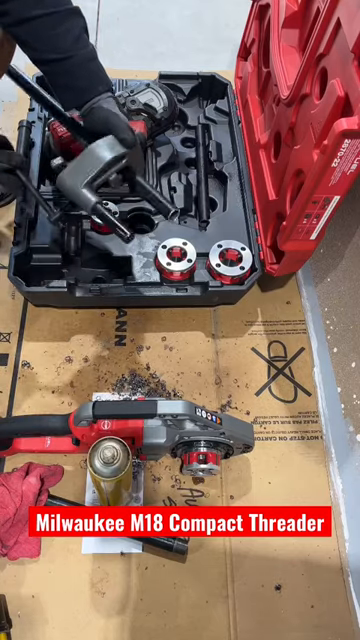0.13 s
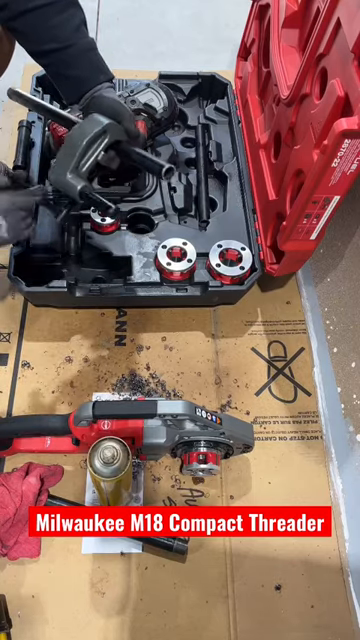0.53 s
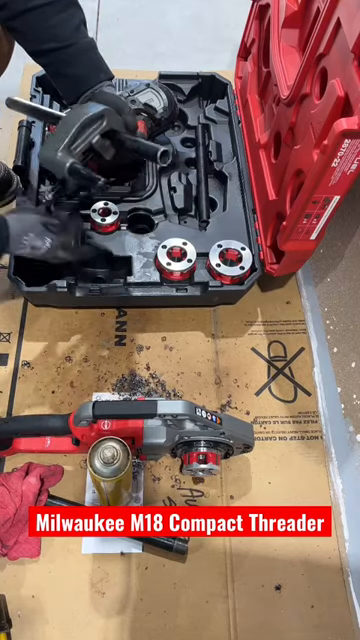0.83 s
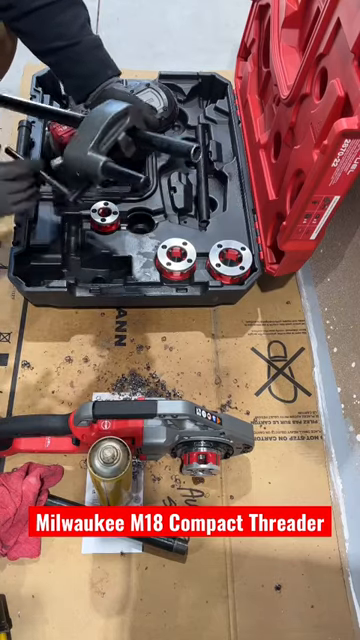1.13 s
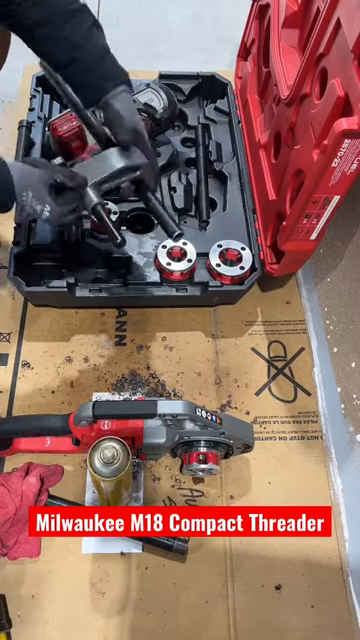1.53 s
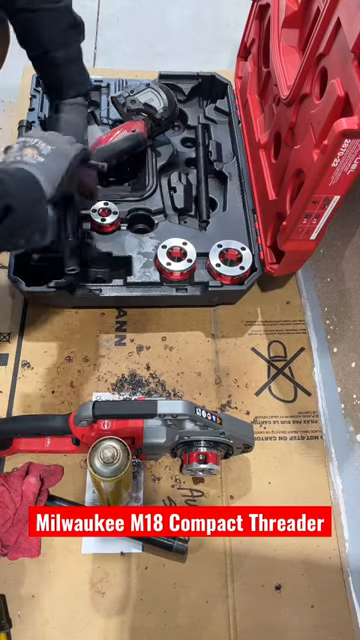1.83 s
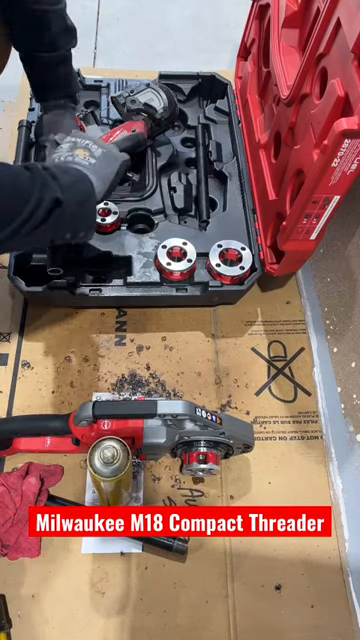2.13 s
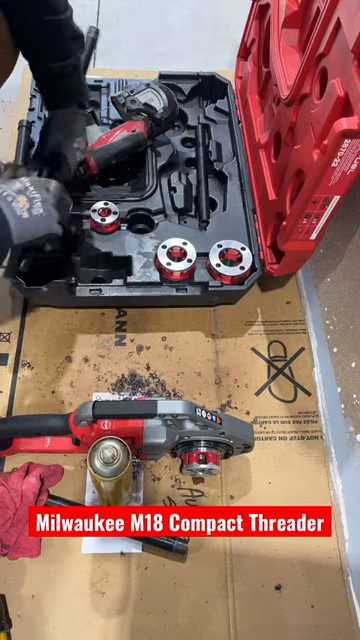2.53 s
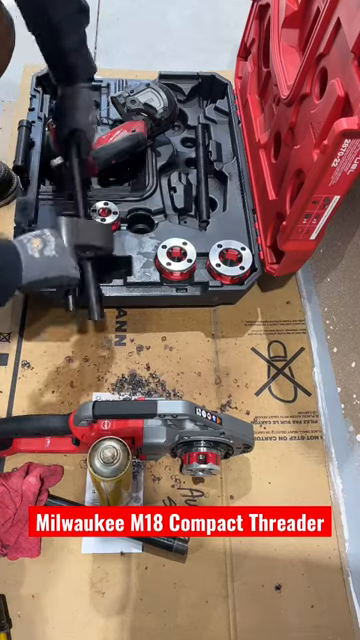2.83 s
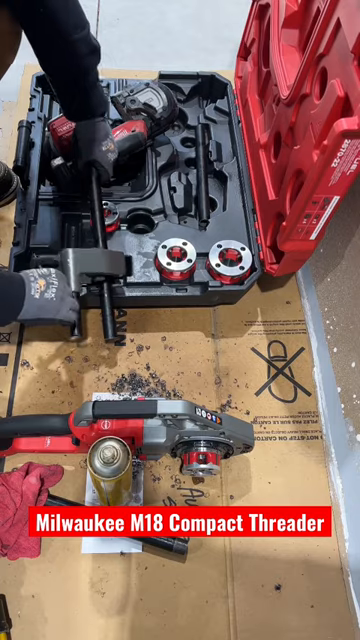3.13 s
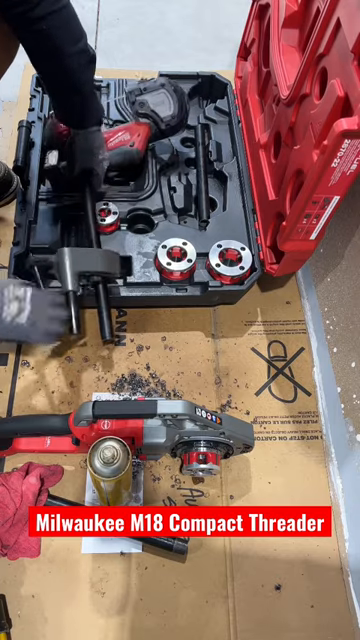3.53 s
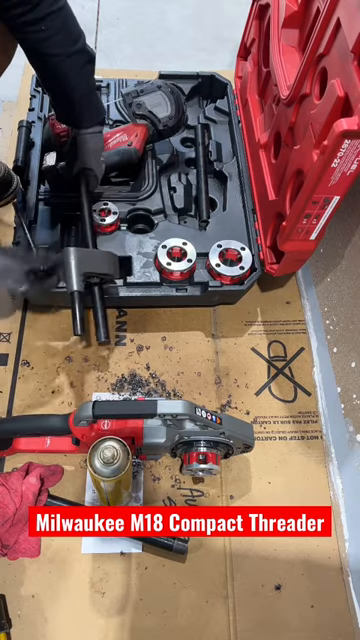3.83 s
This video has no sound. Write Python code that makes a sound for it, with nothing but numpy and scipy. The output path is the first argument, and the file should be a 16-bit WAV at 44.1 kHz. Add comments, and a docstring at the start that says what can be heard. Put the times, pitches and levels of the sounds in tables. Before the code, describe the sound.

A steel tool bracket is handled with gloves: a sharp click, faint rustles and small ticks, then a loud hollow clank on a plastic case, rattling bounces and a harder metal clank; quiet workshop, close stereo microphone.

```python
"""A quiet workshop, close stereo microphone: gloved hands work a steel bracket over a hollow plastic tool case.
Sleeves and gloves rustle as shaped noise; small parts tick, then the bracket drops and bounces as
blows that ring case and steel modes. Its rod squeaks by stick-slip pulses and clanks home, leaving
dying clusters of partials. A distant hum of wavering sines and a murmur of low noise lie beneath."""
import sys
import numpy as np
from scipy import signal
from scipy.io import wavfile

SR = 44100
rng = np.random.default_rng(int(sys.argv[2]) if len(sys.argv) > 2 else 0)


def master_out(mix):
    """Clip the mix to full scale and print it as 16-bit PCM to the path in sys.argv[1]."""
    frames = np.transpose(np.atleast_2d(mix))
    ceiling = np.clip(frames, -1, 1)
    pcm = np.round(ceiling * 32767).astype(np.int16)
    wavfile.write(sys.argv[1], SR, pcm)


def gain_from_decibels(decibels):
    """Convert decibel values to linear amplitude factors."""
    exponent = np.asarray(decibels, float) / 20
    return 10 ** exponent


N = 176400


def unit(x):
    """Scale to rms 1."""
    return x / np.sqrt(np.mean(x ** 2) + 1e-20)


def in_time(rows):
    """Table columns joined by straight lines in time."""
    s, *columns = np.transpose(rows)
    return [np.interp(np.arange(N) / SR, s, column) for column in columns]


def at_hz(rows, hz, axis=1):
    """A table column read on a log-frequency axis."""
    table = np.array(rows)
    return np.interp(np.log(hz), np.log(table[:, 0]), table[:, axis])


def drift(rate_hz):
    """Slow random wander of rms 1: noise through two equal one-pole low-passes."""
    r = np.exp(-2 * np.pi * rate_hz / SR)
    noise = rng.standard_normal(N + SR)
    return unit(signal.lfilter([1], [1, -2 * r, r * r], noise)[SR:])


def band_pass(x, low_hz, high_hz, order=2):
    """Keep one band of the sound."""
    sos = signal.butter(order, [low_hz, high_hz], "band", fs=SR, output="sos")
    return signal.sosfilt(sos, x)


# How alike the two channels hear diffuse noise: f/Hz, left-right likeness (0-1)
LIKENESS = [(100, .999), (250, 0.99), (500, 0.91), (1200, 0.06), (2400, 0.97), (5000, 0.6), (12000, 0.36)]


def noise_bands(size, gain):
    """Stereo noise in half-octave bands, each weighted by gain(hz) and widened by its likeness."""
    edges = 31.5 * 2 ** np.arange(0, 9.3, .5)   # Hz
    white = rng.standard_normal((2, 2, size))
    out = 0
    for k, (low, high) in enumerate(zip(edges, edges[1:])):
        # neighbouring bands use different noise
        mid, side = band_pass(white[k % 2], low, high)
        hz = np.sqrt(low * high)
        alike = np.clip(at_hz(LIKENESS, hz), 0, 1)
        stereo = np.sqrt(1 + alike) * mid + np.sqrt(1 - alike) * side * [[1], [-1]]
        out = out + gain(hz) * stereo
    return out


# Spectrum of the room's murmur: f/Hz, relative level/dB per Hz
MURMUR_SPECTRUM = [(18, -58), (30, -24), (106, 4.5), (165, 1), (194, -10.5), (252, -5), (554, -15),
                   (937, -20), (1100, -23), (1500, -47), (3300, -33.5), (5000, -57), (16000, -59)]


def murmur():
    """Steady low noise of the room."""
    return gain_from_decibels(-59) * unit(noise_bands(N, lambda hz: gain_from_decibels(at_hz(MURMUR_SPECTRUM, hz))))


# Distant hum tones: f/Hz, level/dB, width of the pitch wander/Hz
HUM_TONES = [(192.5, -62, 2.96), (1080, -81, 2.3)]


def hum():
    """Sines whose pitch and level waver slightly, equal in both channels."""
    out = 0
    for hz, db, width_hz in HUM_TONES:
        level = gain_from_decibels(db + 0.83 * drift(19))
        phase = 2 * np.pi * np.cumsum(hz + width_hz / 2 * drift(4.5)) / SR
        out = out + level * np.sqrt(2) * np.sin(phase)
    return out


# Steady rustle over time: t/s, level/dB
RUSTLE_LEVEL = [(0, -66), (.3, -66.5), (.45, -73.5), (.75, -69), (1.05, -71.5), (1.35, -67), (1.6, -67),
                (1.75, -70), (1.95, -73.5), (2.2, -80.5), (2.5, -75), (2.75, -70.5), (3.05, -70), (4, -56)]
# Its spectrum: f/Hz, relative level/dB per Hz
RUSTLE_SPECTRUM = [(710, -24), (1200, -2.5), (1950, -9.5), (2270, -7.5), (3220, -5.5), (4910, -12.5),
                   (9720, -14.5), (16000, -22)]


def steady_rustle():
    """Faint noise between the swishes, its level wandering."""
    noise = unit(noise_bands(N, lambda hz: gain_from_decibels(at_hz(RUSTLE_SPECTRUM, hz))))
    return noise * gain_from_decibels(in_time(RUSTLE_LEVEL)[0] + 1.8 * drift(22))


# Dull handling noise over time: t/s, level/dB
SHUFFLE_LEVEL = [(0, -56), (.3, -61.5), (.42, -79.5), (.8, -62.5), (1.1, -70.5), (1.35, -64), (1.45, -56.5),
                 (1.55, -72.5), (1.9, -86), (1.97, -68), (2.05, -109.5), (2.9, -108), (3.05, -56.5),
                 (4, -55)]
# Bands that colour it: f/Hz, width/Hz, relative level/dB
SHUFFLE_BANDS = [(520, 106, 25.5), (900, 130, 19), (1510, 440, -23.5)]


def shuffle(white):
    """Dull handling: noise in a few mid bands, partly shared by the channels."""
    stereo = white[0] + 1.0 * white
    dull = 0
    for hz, width, db in SHUFFLE_BANDS:
        dull = dull + gain_from_decibels(db) * unit(band_pass(stereo, hz - width / 2, hz + width / 2, order=1))
    return unit(dull) * gain_from_decibels(in_time(SHUFFLE_LEVEL)[0] + 1.92 * drift(40))


def contact_rise(t):
    """A blow's onset: the contact takes 0.9 ms to build."""
    return np.minimum(t / 0.0009, 1)


def blows(hits, modes, crack_db, crack_s, wash_db, wash_s, spread_db, uneven_db):
    """Each blow rings the modes plus a noise crack and a longer wash; soft contacts are dull, light ones thin."""
    mode_scatter = 0.027   # each contact point shifts the modes by about this share
    rattle_per_s = 150   # rate at which the wash's unevenness changes
    out, t = np.zeros(N + SR), np.arange(SR // 3) / SR
    hz, db, t60 = np.array(modes).T[:, :, None]
    for s, level_db, hard_hz, low_hz in hits:
        luck = rng.standard_normal((3, len(modes), 1))
        level = np.sign(luck[0]) * gain_from_decibels(db + spread_db * luck[1] - 60 * t / t60)
        ringing = np.sum(level * np.sin(2 * np.pi * hz * (1 + mode_scatter * luck[2]) * t), axis=0)
        rattle_db = uneven_db * np.interp(t * rattle_per_s, np.arange(200), rng.standard_normal(200))
        crack = gain_from_decibels(crack_db - 60 * t / crack_s)
        wash = gain_from_decibels(crack_db + wash_db + rattle_db - 60 * t / wash_s)
        blow = ringing + (crack + wash) * rng.standard_normal(len(t))
        high_hz = np.clip(hard_hz, low_hz * 1.1, 19000)
        blow = band_pass(blow * contact_rise(t), low_hz, high_hz, order=3)
        start = int(s * SR)
        out[start:start + len(t)] += gain_from_decibels(level_db) * blow
    mic_low_cut = signal.butter(2, 95.3, "high", fs=SR, output="sos")
    return signal.sosfilt(mic_low_cut, out[:N])


# Steel against steel: t/s, level/dB, contact hardness f/Hz, lowest moving f/Hz
STEEL_HITS = [(0.063, -49, 16500, 1940), (0.0972, -23.5, 7200, 2280), (0.0985, -36.5, 15900, 9700),
              (0.361, -65, 9000, 2300), (0.485, -57, 3970, 2000), (0.570, -51.5, 3500, 2670),
              (0.603, -50.5, 2800, 1530), (0.633, -48.5, 14000, 4530), (0.704, -57, 9000, 3000),
              (1.165, -61, 12000, 5060), (1.206, -45.5, 12000, 1800), (1.308, -51.5, 5000, 2500),
              (1.322, -48.5, 8300, 2450), (1.715, -60, 10200, 6100), (1.798, -61, 12000, 2840),
              (2.325, -69, 15000, 9000), (2.674, -65, 7000, 1980), (2.74, -68, 4500, 2000),
              (3.0735, -20, 16400, 2800), (3.079, -16, 6960, 1960), (3.093, -29, 12000, 2000),
              (3.336, -43, 5450, 3380), (3.355, -34, 8800, 2870), (3.404, -38, 4050, 3060),
              (3.564, -46.5, 14000, 5760), (3.610, -45, 14900, 2460), (3.717, -14.5, 16500, 3200),
              (3.7185, -7.5, 10400, 9480), (3.7215, -50, 14000, 3480), (3.866, -53, 14000, 5000)]
# Short-ringing steel modes: f/Hz, relative level/dB
STEEL_MODES = [(2400, 7), (3050, 4.5), (3500, 3), (3900, 8.5), (4250, 6), (4700, 1), (5300, -15), (5800, 0),
               (6500, -17), (9400, 7), (10250, -9), (11200, 3), (13700, -6)]


def steel_clanks():
    """Steel blows: modes that die within 5 ms, a bright crack and a faint longer wash."""
    modes = [(hz, db, .005) for hz, db in STEEL_MODES]   # t60 in s
    return blows(STEEL_HITS, modes, crack_db=4.5, crack_s=0.029, wash_db=-23, wash_s=0.32,
                 spread_db=1.5, uneven_db=0.5)


# Blows on the case: t/s, level/dB, contact hardness f/Hz, lowest moving f/Hz
CASE_HITS = [(0.0972, -40.5, 1070, 500), (0.279, -52, 2900, 700), (0.70, -48.5, 700, 248),
             (1.208, -45.5, 1170, 910), (1.21, -52, 2060, 1750), (1.422, -50, 1180, 700),
             (1.443, -50, 1200, 500), (1.94, -54.5, 1720, 1420), (1.955, -53, 1650, 1230),
             (1.984, -48.5, 1070, 770), (2.643, -44, 1210, 600), (2.658, -59, 1200, 603),
             (2.683, -41, 1480, 387), (2.685, -41, 1090, 784), (3.0705, -7.5, 2420, 342),
             (3.0735, -7.5, 900, 126), (3.0765, -3.5, 338, 212), (3.079, -16.5, 563, 79),
             (3.087, -23, 400, 107), (3.093, -18, 2530, 296), (3.145, -30, 1800, 298),
             (3.167, -34, 1200, 400), (3.18, -30, 835, 159), (3.24, -37.5, 1460, 298),
             (3.295, -39, 604, 151), (3.337, -50.5, 2180, 900), (3.345, -35.5, 2670, 600),
             (3.347, -27.5, 500, 147), (3.354, -27, 1120, 500), (3.358, -25, 2130, 1420),
             (3.361, -17.5, 396, 190), (3.364, -29, 520, 360), (3.379, -26, 2140, 1470),
             (3.386, -33.5, 490, 134), (3.401, -33.5, 700, 137), (3.442, -40, 700, 142),
             (3.513, -46, 1510, 202), (3.548, -32, 700, 272), (3.568, -34, 1600, 463),
             (3.58, -30.5, 204, 100), (3.610, -29, 2650, 454), (3.622, -28.5, 1440, 278),
             (3.7185, -11, 1800, 520), (3.722, -27, 970, 142), (3.737, -25, 1150, 403),
             (3.79, -32, 1990, 380)]
# Modes of the hollow case: f/Hz, relative level/dB, t60/s
CASE_MODES = [(98, -7, 0.084), (137, 2, 0.11), (181, -8, 0.16), (206.6, -6.5, 0.2), (244.7, -3.5, 0.049),
              (277.5, -5.5, 0.085), (356.4, -7.5, 0.082), (415, -2.5, 0.05), (490.6, -14.5, 0.16),
              (584, -3.5, 0.053), (645, -7, 0.074), (762, -5, 0.027), (867.6, -4.5, 0.038),
              (1025, -11, 0.06), (1288, 7, 0.0098), (1464, -10, 0.039), (1786, -1.5, 0.018),
              (1850, 0, 0.012), (2776, -6, 0.058),]


def case_thumps():
    """Blows ring the hollow case; loose parts buzz unevenly after each."""
    return blows(CASE_HITS, CASE_MODES, crack_db=2.5, crack_s=0.059, wash_db=-8.5, wash_s=0.13,
                 spread_db=0.0, uneven_db=4.5)


# Free steel parts left ringing: t/s, f/Hz, level of each partial/dB, t60/s, spread of partials/Hz
FREE_RINGS = [(0.099, 10050, -49.5, 0.21, 156), (0.099, 7250, -52, 0.33, 150), (3.08, 14350, -41, 0.18, 40),
              (3.143, 4030, -68, 0.13, 34), (3.718, 5550, -45, 0.23, 14), (3.72, 2320, -51, 0.4, 40),
              (3.722, 10500, -57, 0.25, 298), (3.72, 14580, -53, 0.27, 40), (3.72, 900, -30, 0.15, 35)]


def rings():
    """Dying rings, each a close uneven cluster of six partials."""
    out, t = np.zeros(N + SR), np.arange(SR // 2) / SR
    for s, hz, db, t60, spread_hz in FREE_RINGS:
        luck = rng.standard_normal((2, 6, 1))
        partials = np.sin(2 * np.pi * (hz + spread_hz * luck[0]) * t + 2 * luck[1])
        start = int(s * SR)
        out[start:start + len(t)] += gain_from_decibels(db - 60 * t / t60) * partials.sum(0) * contact_rise(t)
    return out[:N]


# Glove and sleeve swishes: t/s, length/s, cloth level/dB, duller rubbing level/dB
SWISH_STROKES = [(0.361, 0.012, -49.5, -57), (0.467, 0.018, -61.5, -73), (0.613, 0.039, -61.5, -81),
                 (0.872, 0.1, -69, -69.5), (1.086, 0.018, -69, -80), (1.267, 0.097, -61.5, -76),
                 (1.388, 0.11, -71, -73), (1.493, 0.044, -67.5, -61.5), (1.528, 0.084, -58, -70),
                 (1.631, 0.039, -60, -75), (1.795, 0.024, -60.5, -75), (1.837, 0.076, -74, -75),
                 (2.535, 0.038, -57.5, -62), (2.56, 0.058, -52.5, -70), (2.656, 0.06, -69.5, -77),
                 (2.792, 0.032, -77, -67), (2.808, 0.054, -56, -65), (2.922, 0.15, -73, -83),
                 (3.328, 0.091, -54.5, -51.5), (3.514, 0.08, -68, -64), (3.954, .08, -54.5, -58.5)]


def strokes():
    """Level over time of all strokes together, for the cloth and for the rubbing under it."""
    edge_s, fade_s = 0.05, 0.053   # rise and fall of a stroke, centred on its two ends
    t = np.arange(N) / SR
    s, length, cloth_db, rub_db = np.array(SWISH_STROKES).T[:, :, None]
    ramp = np.minimum((t - s) / edge_s, (s + length - t) / fade_s) + .5
    stroke = np.sin(np.pi / 2 * np.clip(ramp, 0, 1)) ** 4
    return np.sum(gain_from_decibels(cloth_db) * stroke, axis=0), np.sum(gain_from_decibels(rub_db) * stroke, axis=0)


# Spectrum of the cloth: f/Hz, relative level/dB per Hz
CLOTH_SPECTRUM = [(710, -43), (1200, -12), (2180, -23.5), (3790, 5.5), (4550, -4), (6300, -2.5), (7020, 3),
                  (13600, -2), (16000, -7)]


def cloth_swishes(level):
    """Bright cloth noise, each band flickering on its own, with a fast grain over all."""
    cloth = unit(noise_bands(N, lambda hz: gain_from_decibels(at_hz(CLOTH_SPECTRUM, hz) + 2.9 * drift(32))))
    return cloth * level * gain_from_decibels(2 * drift(144))


def rubbing(white, level):
    """Grainy, duller noise under the swishes, nearly alike in both channels."""
    rub = unit(band_pass(white[0] + 0.14 * white, 2370, 4500))
    return rub * level * gain_from_decibels(2.5 * drift(100))


# The rod squeaks in its bore: t/s, level/dB, slips per s, brightness/dB
SQUEAK_COURSE = [(3.655, -77, 1360, -20), (3.668, -47.5, 1080, -6), (3.682, -39.5, 1370, -10),
                 (3.695, -38, 1320, 4.5), (3.714, -38, 1200, 2.5), (3.717, -22, 1200, -16)]
# Resonances of the rod: f/Hz, width/Hz, relative level/dB, share of the brightness taken (0-1)
ROD_BANDS = [(1360, 1200, 0.5, 0), (2230, 240, -10.5, 0.4), (3870, 500, -13.5, 0), (7160, 566, -5.5, 0.96),
             (8600, 800, -2.5, 0.8), (10300, 730, -7, 1), (12000, 1900, -5.5, 0.84)]


def squeak():
    """Stick-slip pulses, uneven in timing and strength, ring the rod's resonances."""
    db, rate, bright_db = in_time(SQUEAK_COURSE)
    t = np.arange(N) / SR
    cycles = np.cumsum(rate * (1 + 0.033 * drift(400))) / SR
    pulses = np.diff(np.floor(cycles), prepend=0)
    slips = pulses * (1 + 0.95 * rng.standard_normal(N)) + 0.041 * rng.standard_normal(N)
    out = 0
    for hz, width, band_db, bright in ROD_BANDS:
        band = unit(band_pass(slips, hz - width / 2, hz + width / 2))
        out = out + gain_from_decibels(band_db + bright * bright_db) * band
    return gain_from_decibels(db) * out * (t > SQUEAK_COURSE[0][0]) * (t < SQUEAK_COURSE[-1][0])


def ports(x):
    """Two close microphone ports: most of the treble reaches the left one sample late, the mids lean left."""
    lean = gain_from_decibels(-12) * band_pass(x, 500, 1730)
    treble = signal.butter(2, 6500, "high", fs=SR, output="sos")
    late = 0.89 * signal.sosfiltfilt(treble, x)
    left = x + lean + np.roll(late, 1) - late
    right = gain_from_decibels(-1) * (x - lean)
    return np.array([left, right])


# The workshop's tail: f/Hz, t60/s, level/dB
ROOM_TAIL = [(100, 0.54, -11), (258, 0.4, -11), (700, 0.54, -10.5), (1800, 0.76, -18), (3150, 0.53, -14),
             (5730, 0.84, -13), (9000, 0.74, -22.5), (14000, 0.7, -18.5)]


def room(x):
    """Diffuse noise tail that builds over 12 ms and dies band by band."""
    t = np.arange(SR * 3 // 4) / SR

    def decay(hz):
        t60 = at_hz(ROOM_TAIL, hz)
        # the root evens out the energy of long and short tails
        return gain_from_decibels(at_hz(ROOM_TAIL, hz, axis=2) - 60 * t / t60) / np.sqrt(t60 * SR / 14)

    tail = noise_bands(len(t), decay) * np.minimum(t / 0.012, 1)
    return signal.fftconvolve(x.mean(0)[None], tail, axes=1)[:, :N]


def scene():
    """Blows, rings and squeak in the room, over rustle, murmur and hum."""
    near = ports(case_thumps() + steel_clanks() + rings() + squeak())
    struck = near + room(near)
    cloth_level, rub_level = strokes()
    handling = cloth_swishes(cloth_level) + steady_rustle()
    white = rng.standard_normal((2, N))   # shared by rubbing and shuffle
    handling = handling + rubbing(white, rub_level) + shuffle(white)
    return struck + handling + murmur() + hum()


def low_pass(x):
    """Removes everything above the highest recorded frequency."""
    return signal.sosfilt(signal.butter(12, 16990, fs=SR, output="sos"), x)


def record(dry):
    """Peaks are rounded toward full scale, then the top is cut to 50 dB down from 17 kHz."""
    rounded = np.tanh(dry)
    top_cut = signal.cheby2(10, 50, 17000, fs=SR, output="sos")
    mix = signal.sosfilt(top_cut, rounded)
    return low_pass(mix)


dry = scene()
out = record(dry)
master_out(out)
```